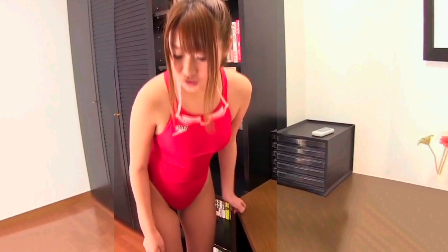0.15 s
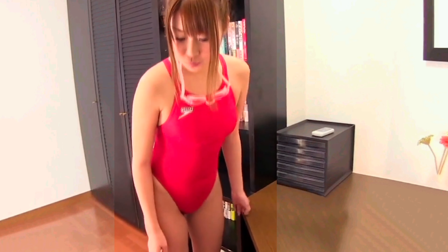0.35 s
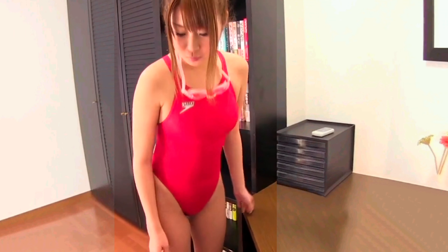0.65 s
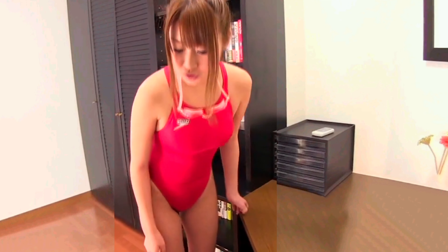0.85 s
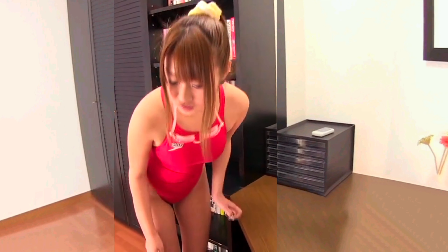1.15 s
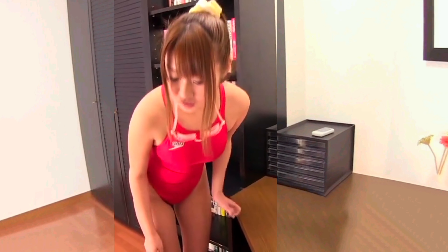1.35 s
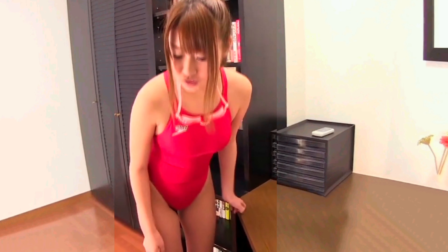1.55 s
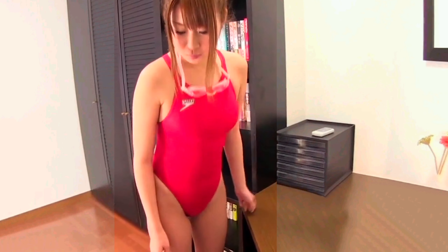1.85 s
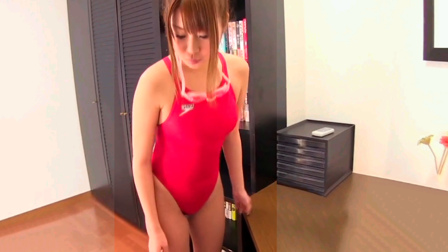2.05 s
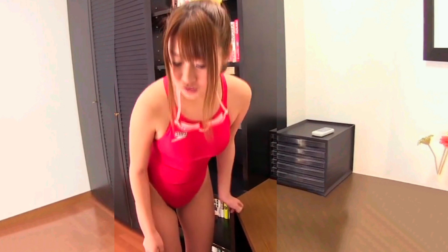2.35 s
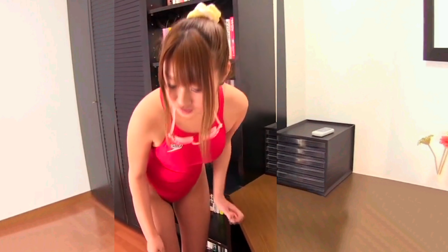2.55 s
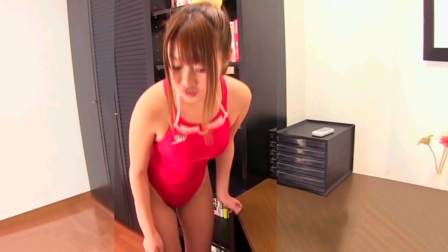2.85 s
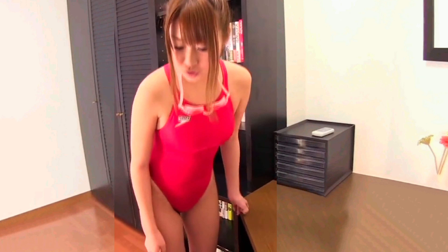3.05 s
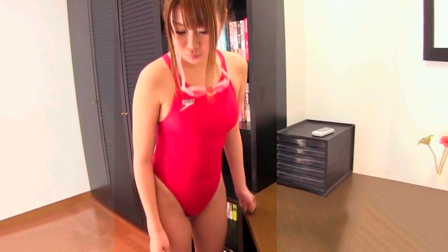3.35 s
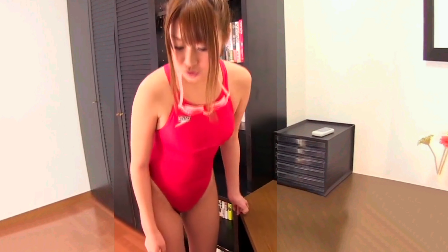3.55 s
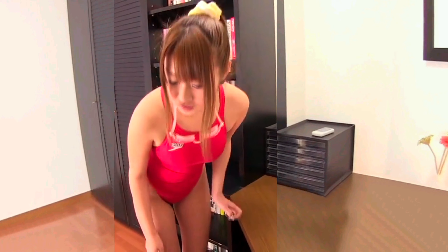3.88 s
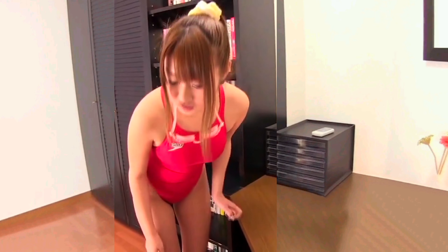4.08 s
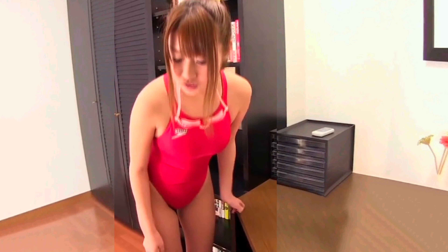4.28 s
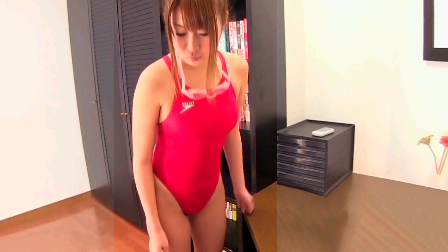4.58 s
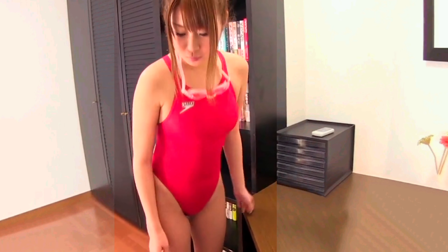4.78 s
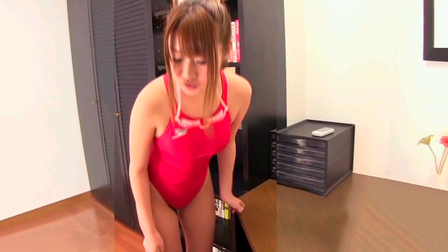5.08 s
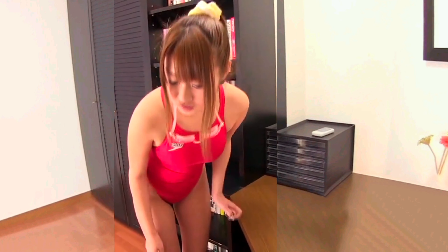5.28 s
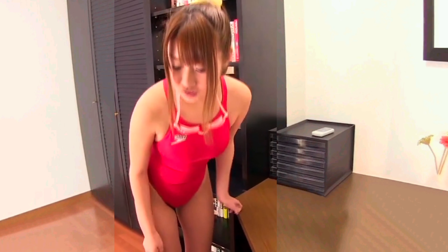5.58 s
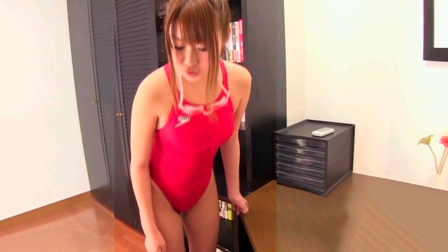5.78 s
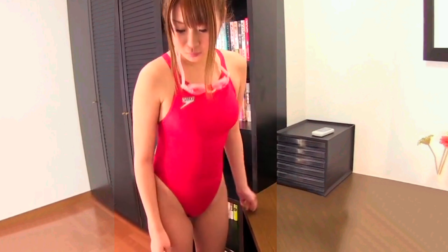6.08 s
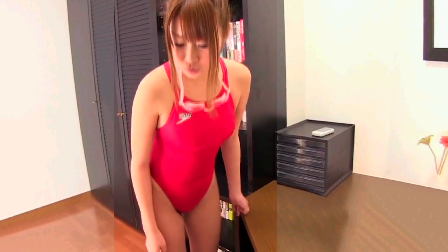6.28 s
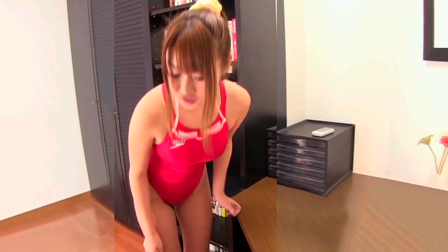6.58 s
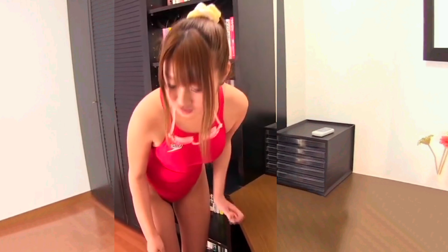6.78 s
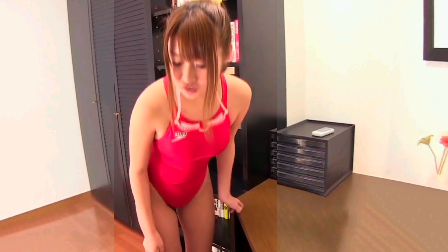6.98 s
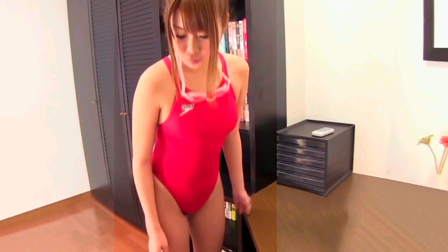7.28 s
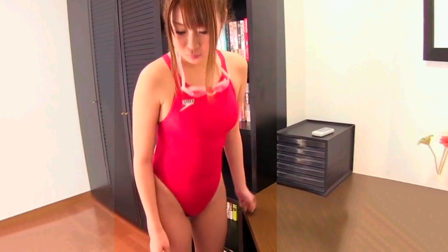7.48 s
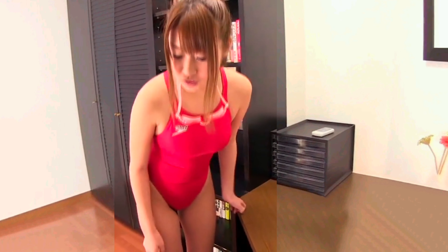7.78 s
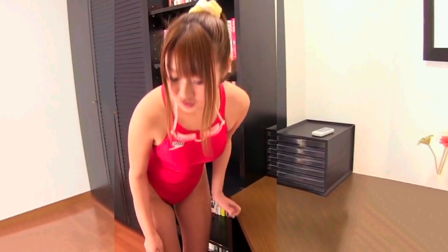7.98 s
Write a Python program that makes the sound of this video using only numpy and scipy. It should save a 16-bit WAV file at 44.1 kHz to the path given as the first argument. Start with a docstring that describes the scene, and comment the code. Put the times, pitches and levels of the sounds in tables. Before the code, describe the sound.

Constant low, boomy rumble of air through a cooling unit's casing, mixed with soft machine hums and a faint high hiss, without any events.

```python
"""Turbulent air from the blower of an air conditioner rumbles through duct and casing and rushes from the grille:
broadband noise, shaped by resonances and by the reflections of a small room, a few metres from a microphone.
Blower and compressor add harmonic hums, motor and panels faint steady tones, all slightly unsteady.
A thin, slightly flickering hiss lies over all, wide below 7 kHz and nearly mono above.
A steep low-pass filter closes the spectrum."""
import sys
import numpy as np
from scipy import signal
from scipy.fft import rfft, irfft
from scipy.io import wavfile

SR = 44100
rng = np.random.default_rng(int(sys.argv[2]) if len(sys.argv) > 2 else 0)


def bounce(signal):
    """Save signal as a 16-bit WAV file at the path given by the first command-line argument."""
    frames = np.transpose(np.atleast_2d(signal))
    limited = np.clip(frames, -1, 1)
    pcm = np.round(limited * 32767).astype(np.int16)
    wavfile.write(sys.argv[1], SR, pcm)


N = 358533  # length in samples

# In all tables "common" is the part shared by both ears, "difference" the part of opposite sign.
# Turbulence of blower and grille, before duct and grille shape it: f/Hz, level/dB [per Hz]
AIR = [(5, -58), (14, -59), (26, -50.5), (45, -54.5), (75, -48.5), (110, -48), (175, -45), (240, -54),
       (325, -64.5), (455, -70), (560, -70.5), (700, -74.5), (900, -77), (1200, -82), (1900, -79.5),
       (3600, -88.5), (6000, -93.5)]
# Resonances (positive lift) and notches (negative) of duct and casing: f/Hz, width/Hz, lift/dB
DUCT = [(82.7, 4.8, 5), (90.9, 4.3, 7.5), (128, 9, -1), (139.3, 19, 3), (176.4, 26.5, 3.5), (233, 12, -3),
        (252, 18, 2.5), (287, 51, 2), (336, 13, -2.5), (371.7, 63, 8), (411.3, 30.5, 5.5), (449, 25, -2),
        (512, 23, 2.5), (572, 14, 3), (584, 8, -3.5), (604, 14, 3.5), (623.6, 18, 7.5), (645.4, 13, 6.5),
        (730, 30, 3), (769, 30, 6), (824, 14, 3.5), (1042, 80, 5), (1112, 40, 4.5), (1250, 27, 3),
        (1347, 54, 7), (1500, 40, 4.5), (1580, 60, 1.5), (1639, 39, 6), (1810, 71, 4.5), (2220, 70, 4),
        (2380, 50, -1), (2450, 70, 2), (2900, 150, 1.5), (3150, 44, 2), (3360, 130, 3.5), (3750, 190, 5)]
# Stereo width of the air sound: f/Hz, level/dB [difference relative to common]
WIDTH = [(25, -7), (45, -4), (60, -13), (90, -14.5), (135, -9.5), (205, -18.5), (300, -11), (700, -8),
         (810, -10), (862, -3), (920, -13), (1100, -17), (2200, -15), (4000, -23)]
# Harmonics of blade passing: multiple [1], common level/dB, difference level/dB
BLOWER = [(1, -34, -42), (2, -34.5, -49.5), (3, -36.5, -60)]
# Harmonics of the compressor shaft: multiple [1], common level/dB, difference level/dB
COMPRESSOR = [(1, -43, -50), (2, -33.5, -47), (4, -75, -45)]
# Faint tones of motor and panels: f/Hz, common level/dB, difference level/dB
WHINES = [(164.5, -41, -51), (258, -42, -55), (360.8, -54, -62), (417, -55, -67), (428, -56.5, -69),
          (462, -54.5, -78), (530, -52.5, -71), (999, -64, -77)]
# Thin hiss, wide below 7 kHz and nearly mono above:
# f/Hz, common level/dB [per Hz], difference level/dB [per Hz]
HISS = [(1000, -91.5, -88), (4480, -97.5, -92.5), (6750, -95, -95.5), (7050, -93, -102), (9100, -92, -103),
        (11200, -93, -105), (15000, -96.5, -109)]

BLOWER_HZ, COMPRESSOR_HZ = 73.19, 58.77  # mean fundamentals
FLICKER_DB, FLICKER_HZ = 0.54, 11  # spread and pace of the slight flicker of the hiss
TOP_HZ = 15430  # upper edge of the passband


def airflow(flutter_db=0.44, flutter_hz=13.0, grille_hz=6500):
    """Resonance: broadband turbulence excites duct and casing, which lift it near their own frequencies."""
    f = bins()
    lift_db = sum(db / (1 + (2 * (f - hz) / width) ** 2) for hz, width, db in DUCT)
    # the smallest eddies at the grille set where the rush dies away
    grille = 1 / np.hypot(1, (f / grille_hz) ** 2)
    gain = undb(curve(AIR) + lift_db) * grille

    def through_room(share):
        return noise(gain * share * room(t60=0.33, wet_db=-11.5, above_hz=850))

    mid = through_room(1)
    side = through_room(undb(curve(WIDTH)))
    return stereo(mid, side) * undb(flutter_db * walk(flutter_hz))


def room(t60, wet_db, above_hz):
    """Multipath interference: dense wall reflections ripple the spectrum above the lowest room modes."""
    t = np.arange(N) / SR
    # decays by 60 dB in t60 seconds
    tail = rng.standard_normal(N) * np.exp(-np.log(1000) * t / t60)
    reflections = rfft(tail / np.linalg.norm(tail))
    share = undb(wet_db) * bins() ** 2 / (bins() ** 2 + above_hz ** 2)
    return (1 + share * reflections) / np.sqrt(1 + share ** 2)  # mean power is kept


def machine(hz, harmonics, drift):
    """Fourier series: a periodic rotation radiates whole multiples of its rate."""
    phase = rotation(hz, drift)
    return sum(tone(multiple * phase, mid_db, side_db) for multiple, mid_db, side_db in harmonics)


def whines(drift=0.0008):
    """Free-running oscillation: motor and panels sing faintly at unsteady pitches of their own."""
    return sum(tone(rotation(hz, drift), mid_db, side_db, waver_db=1.45)
               for hz, mid_db, side_db in WHINES)


def rotation(hz, drift):
    """Phase is the time integral of frequency, here with a relative spread of drift."""
    speed_hz = hz * (1 + drift * walk(0.85))
    return 2 * np.pi * np.cumsum(speed_hz) / SR


def tone(phase, mid_db, side_db, waver_db=2.5):
    """Standing waves: a wavering hum reaches left and right out of step."""
    phase = phase + rng.uniform(0, 2 * np.pi)
    mid = undb(mid_db) * np.sin(phase)
    side = undb(side_db) * np.cos(phase)
    waver = undb(waver_db * walk(2.44))
    return np.sqrt(2) * waver * stereo(mid, side)  # root 2 turns RMS into peak


def thin_hiss():
    """Amplitude modulation: independent common and difference noises flicker together slightly in level."""
    mid = noise(undb(curve(HISS, column=1)))
    side = noise(undb(curve(HISS, column=2)))
    return stereo(mid, side) * undb(FLICKER_DB * walk(FLICKER_HZ))


def undb(db):
    """Logarithmic level: 20 dB are a factor of ten in amplitude."""
    return 10 ** (np.asarray(db) / 20)


def bins():
    """Discrete spectrum: bin frequencies in Hz of the whole signal, held at 1 Hz or above."""
    return np.maximum(np.arange(N // 2 + 1) * SR / N, 1)


def curve(table, column=1):
    """Spectral envelope: one table column interpolated along log frequency."""
    rows = np.array(table, float)
    return np.interp(np.log(bins()), np.log(rows[:, 0]), rows[:, column])


def noise(gain):
    """Linear filtering: white noise shaped to the given amplitude per root Hz."""
    return irfft(rfft(rng.standard_normal(N)) * gain, N) * np.sqrt(SR / 2)


def walk(rate):
    """Band-limited chance: smooth noise of mean 0 and spread 1, changing about rate times a second."""
    f = np.arange(N // 2 + 1) * SR / N
    x = noise(np.exp(-.5 * (f / rate) ** 2))
    return (x - x.mean()) / x.std()


def stereo(mid, side):
    """Superposition: left is common plus difference, right is common minus difference."""
    return np.array([mid + side, mid - side])


def scene():
    """Superposition of the moving air and the hum of the machinery."""
    air = airflow()
    blower = machine(BLOWER_HZ, BLOWER, drift=0.002)
    compressor = machine(COMPRESSOR_HZ, COMPRESSOR, drift=0.00098)
    return air + blower + compressor + whines()


def record(dry):
    """Band limitation: the thin hiss joins the scene, and an elliptic filter cuts the top steeply."""
    low_pass = signal.ellip(12, .1, 90, TOP_HZ, fs=SR, output="sos")  # 0.1 dB ripple, 90 dB stopband
    return signal.sosfilt(low_pass, dry + thin_hiss())


dry = scene()
out = record(dry)
bounce(out)
```